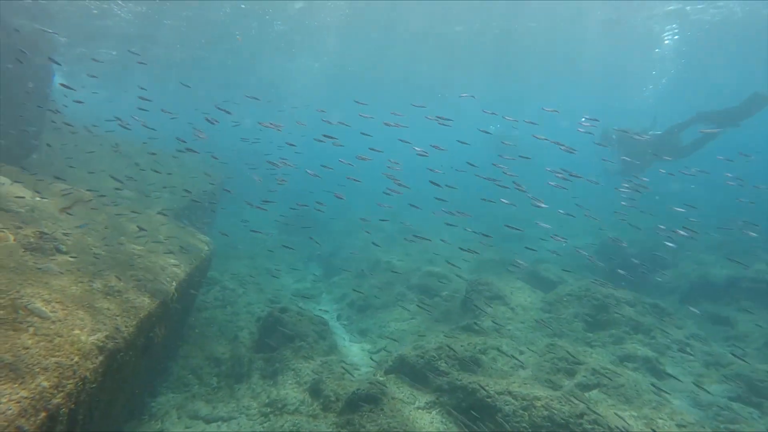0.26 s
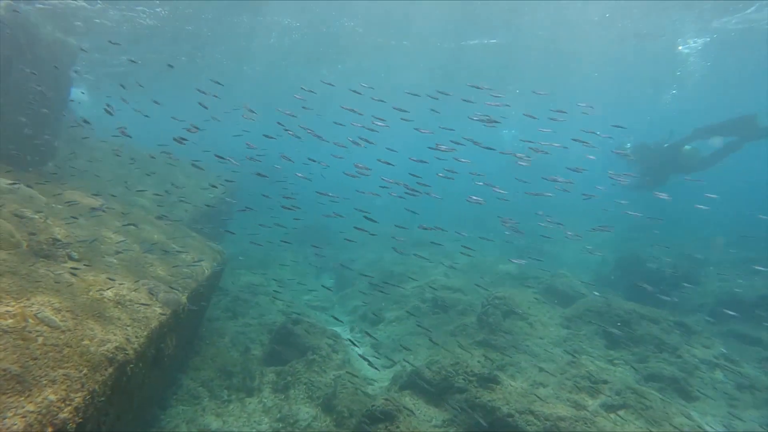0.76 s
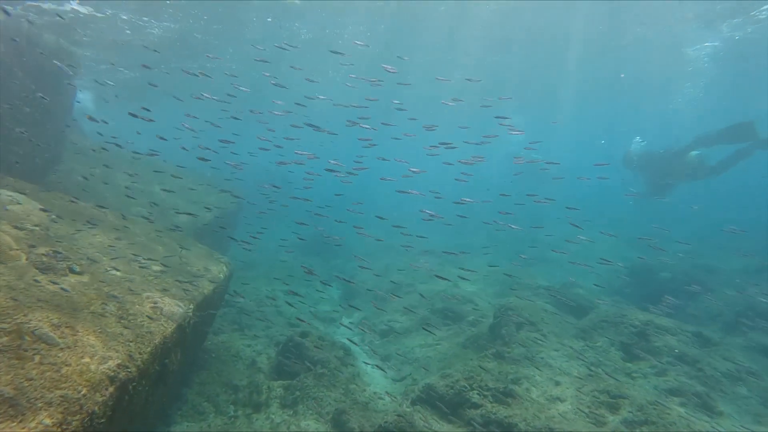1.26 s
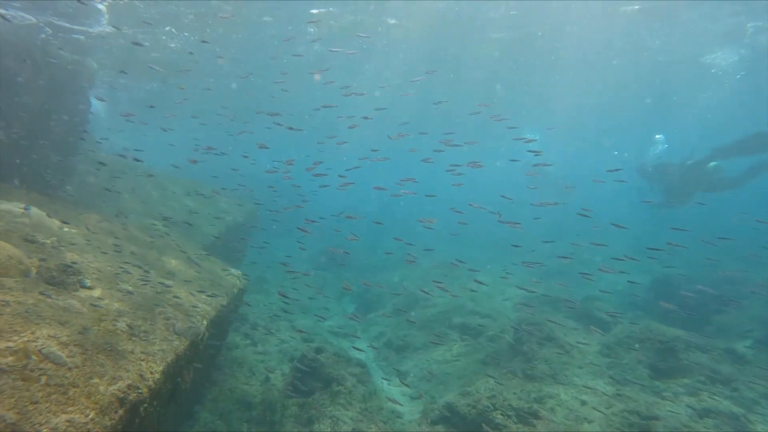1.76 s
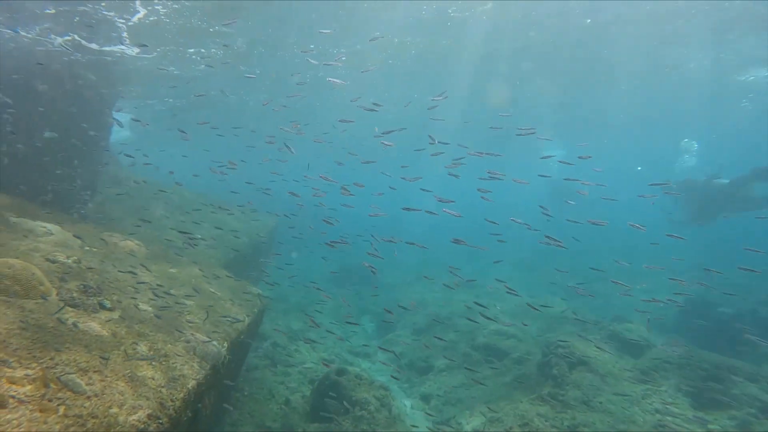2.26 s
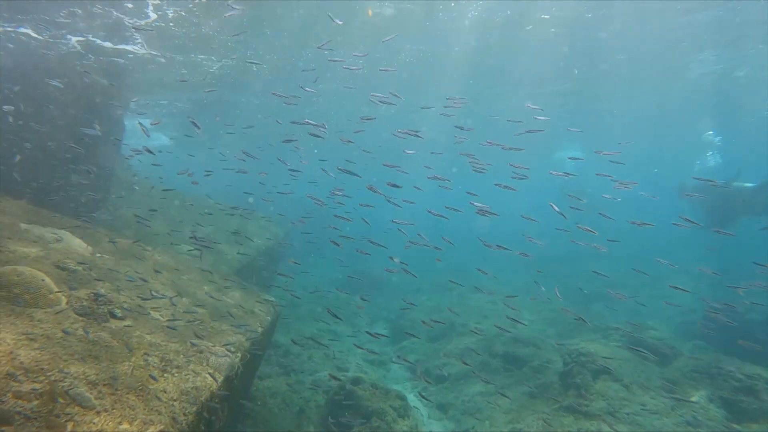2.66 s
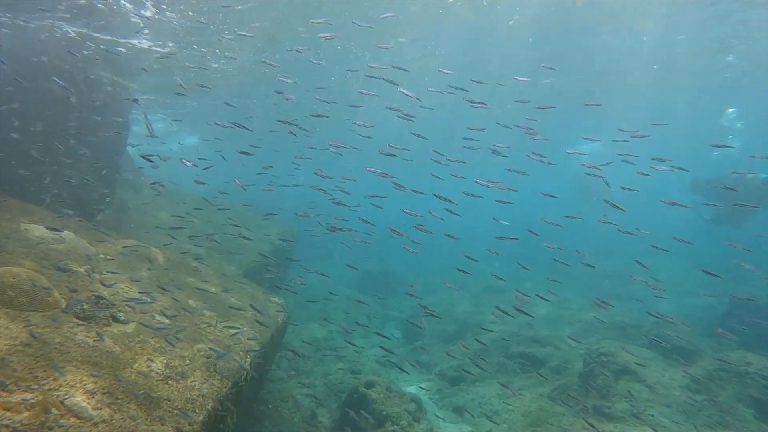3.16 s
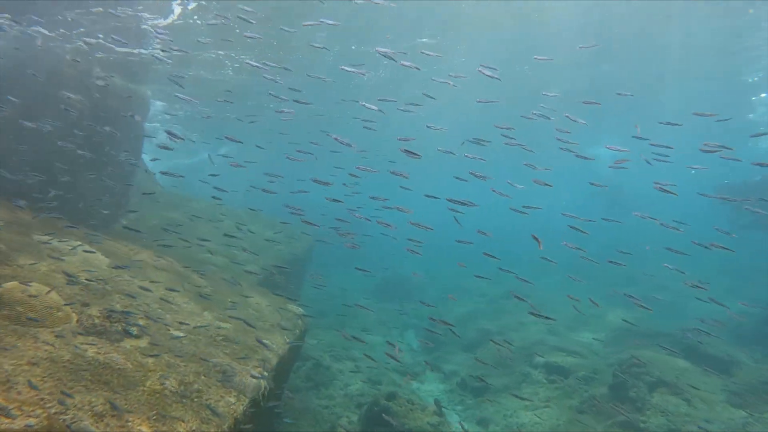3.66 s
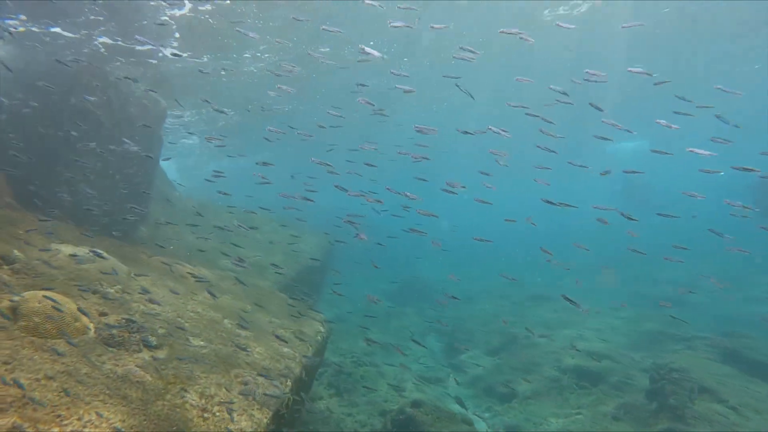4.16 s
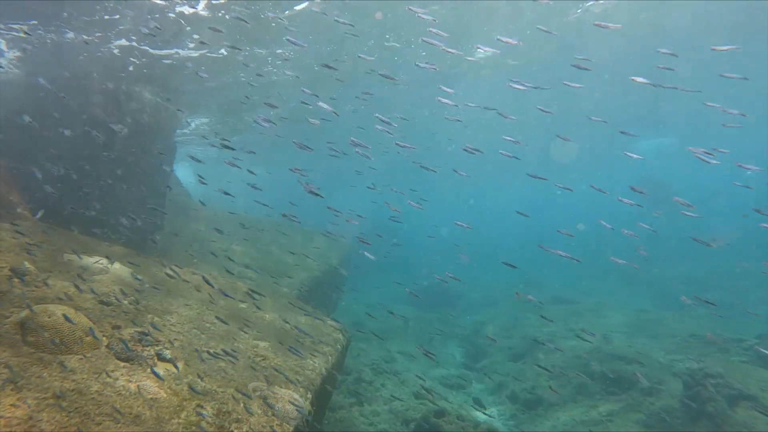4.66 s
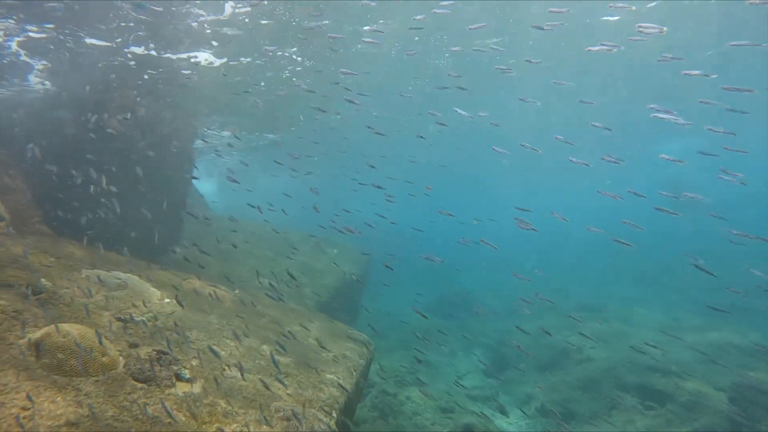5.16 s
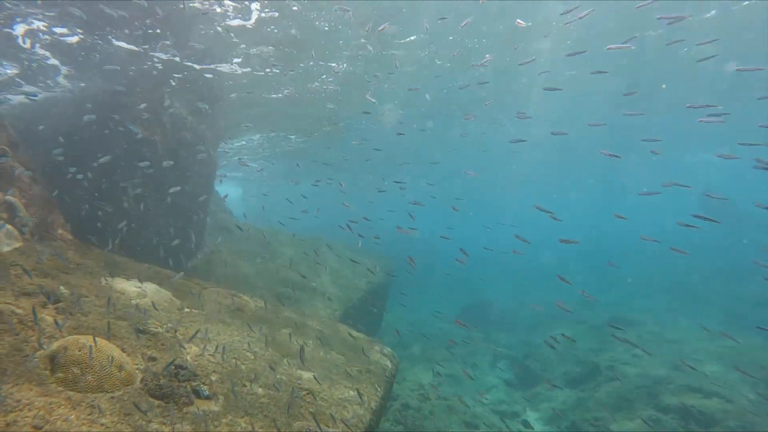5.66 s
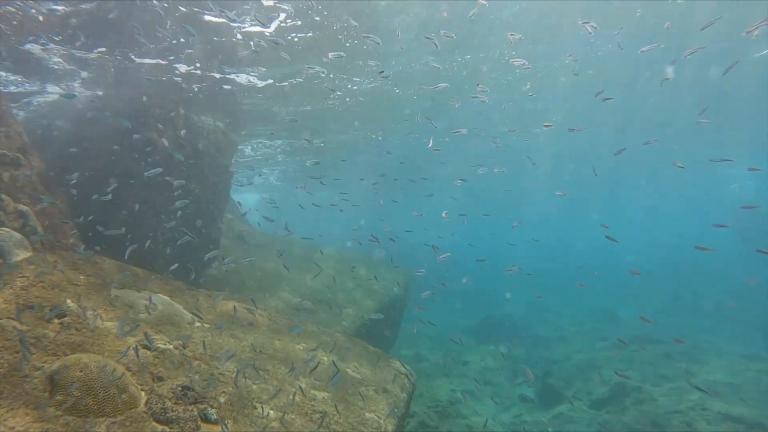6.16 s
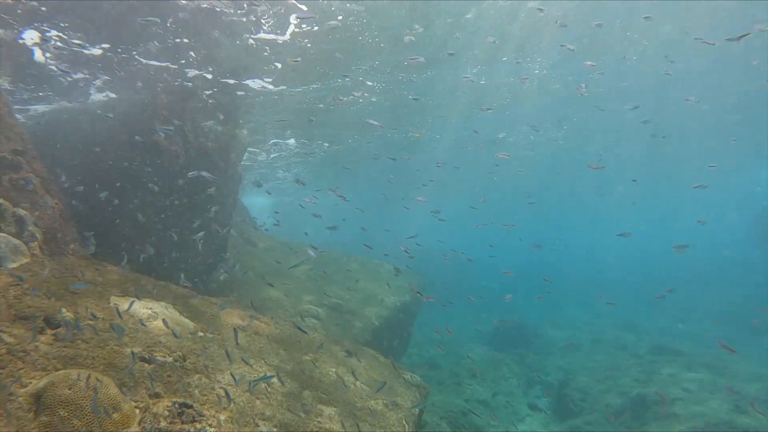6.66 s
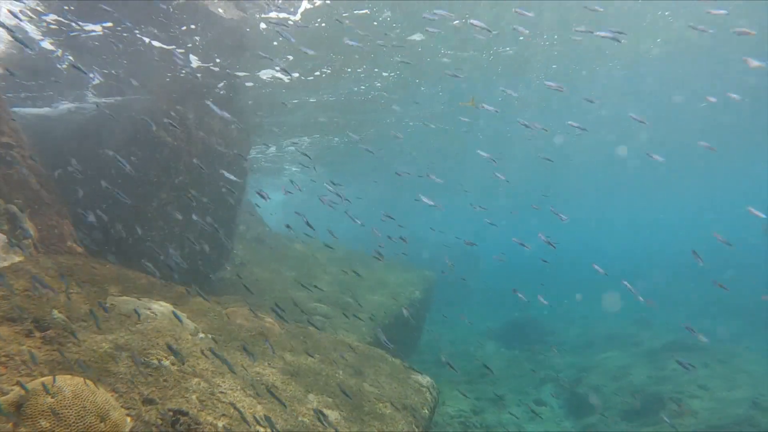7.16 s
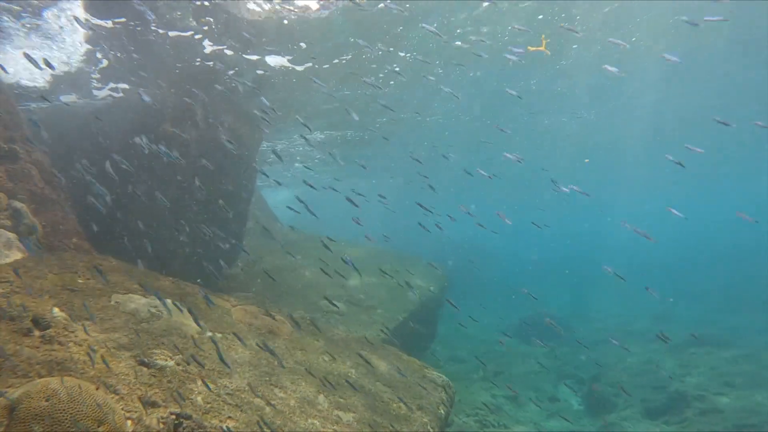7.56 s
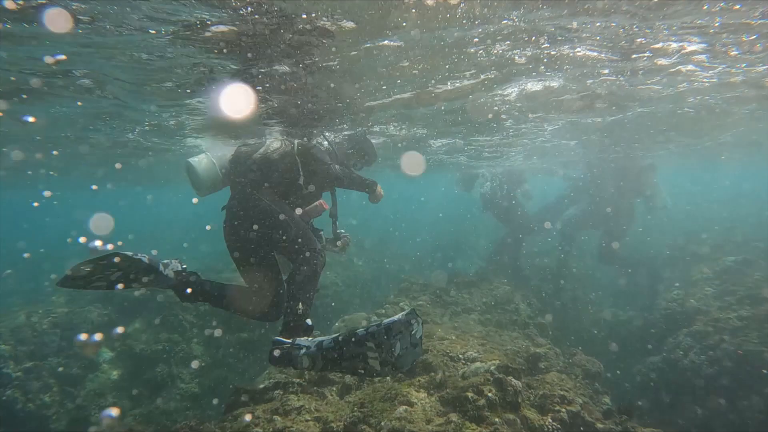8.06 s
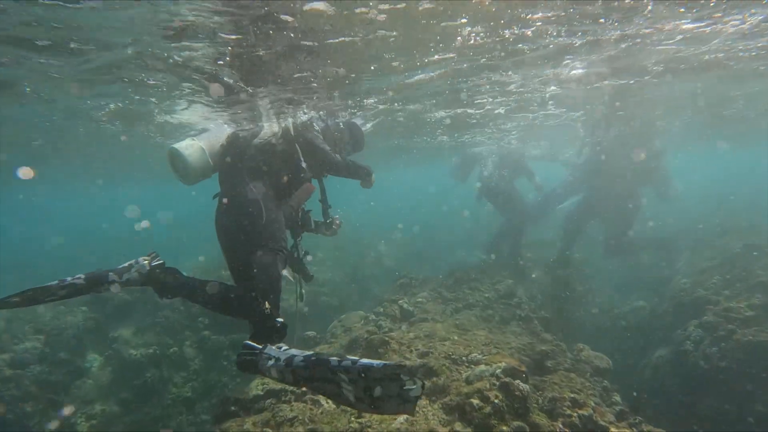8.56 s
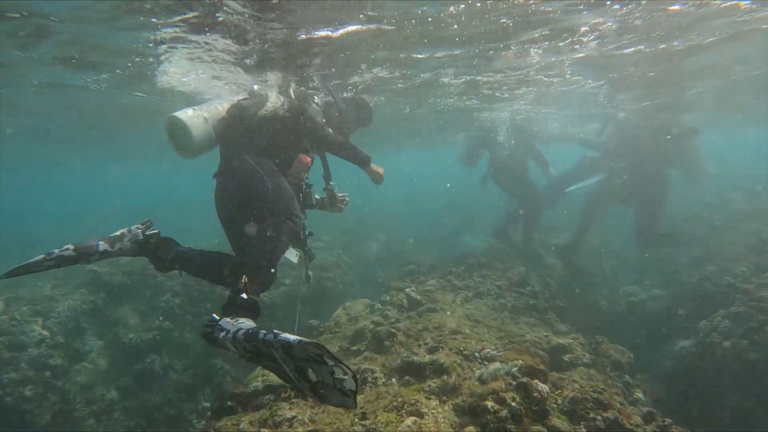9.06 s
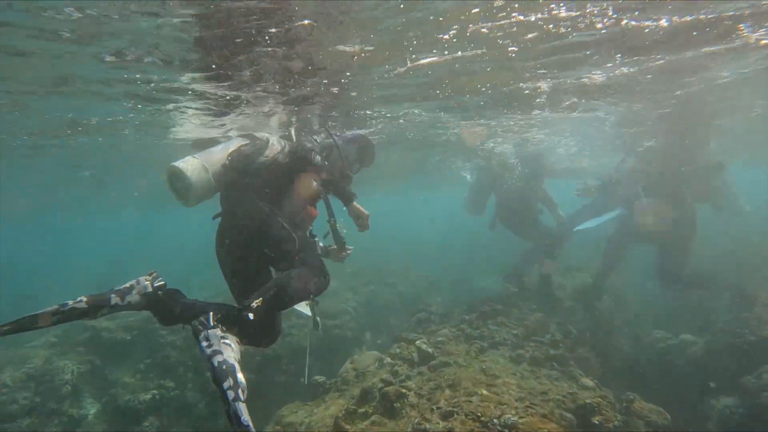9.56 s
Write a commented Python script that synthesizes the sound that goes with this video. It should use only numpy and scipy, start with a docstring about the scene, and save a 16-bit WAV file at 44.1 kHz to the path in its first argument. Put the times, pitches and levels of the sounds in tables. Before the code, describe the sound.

A muffled, boxy underwater ambience from a housed stereo microphone. Deep gurgling and slow shaking lie beneath dry clicks from nearby shrimp, low bubbles and soft thuds; one low moan lingers early. The middle gets busier with sharper snaps and opens from mono to wide. Close to the surface in the last two seconds, crackle is brighter, a wavering low hum rises, and the wash grows.

```python
"""Over a shallow reef, in a sealed housing with two microphones: gurgle, far shrimp crackle and hand tremble
from 0 s. Soon surge thumps, near snaps ringing the housing, bubbles, a moan and plops join; the image opens
from mono after 2.5 s. At 8 s the scene changes to one close to the surface: mode levels shift, a low drone
climbs and a thin fizz swells. From 9 s the upper wash swells. Noise through resonances makes water and fizz,
kicked resonances make snaps, damped sines make the air pockets, and wavering sines make tremble and drone."""
import sys
import numpy as np
from scipy import signal
from scipy.fft import rfft, irfft, next_fast_len
from scipy.io import wavfile
from scipy.ndimage import uniform_filter1d

SR = 44100
rng = np.random.default_rng(int(sys.argv[2]) if len(sys.argv) > 2 else 0)


def to_wav(s):
    """Save 16-bit WAV."""
    ch = np.atleast_2d(s).T  # columns
    pcm = np.round(np.clip(ch, -1, 1) * 32767)  # PCM
    wavfile.write(sys.argv[1], SR, pcm.astype(np.int16))


N = 432180

# near snaps: (time [s], peak at the pivot pitch [dB], brightness [dB/octave], narrowness [dB/octave^2])
NEAR_SNAPS = [(0.07, -16, -14.5, 23), (0.099, -26.5, -8.5, -8), (0.166, -26, -12.5, 5.5),
              (0.191, -40, 11, 2), (0.23, -21, -12, 14.5), (0.478, -50, 11.5, -4.5), (0.551, -23, 11, 7),
              (0.762, -39, 9, 9), (0.824, -36, 14.5, 5), (0.863, -26, 0.5, 8), (0.88, -34, 9, 4),
              (1.039, -23.5, -8, 2.5), (1.054, -46, -19, -8), (1.134, -26.5, -4, 9), (1.188, -27, 0, -0.5),
              (1.248, -26, 4, -0.5), (1.396, -36, 2, -1), (1.7, -34, 2, 1), (1.712, -10, 5, 32),
              (1.714, -24, 5.5, -2), (1.737, -26, -2, 10), (1.755, -10, -6.5, 18), (1.813, -33, 6, 13),
              (1.839, -42, -6, 10), (1.905, -37.5, -17, 7), (2.058, -38, -7.5, -10.5),
              (2.197, -21.5, -10, 14), (2.248, -39.5, -2, -8), (2.274, -17.5, -3, 13),
              (2.349, -23, -8, 8.5), (2.396, -33, -14.5, 8), (2.442, -31, 4, -0.5), (2.561, -38.5, -18, -1),
              (2.631, -28.5, -7, 1), (2.68, -22.5, 3, 10), (2.806, -27.5, -7.5, -0.5),
              (2.848, -53.5, 16, -2.5), (2.87, -47, -3, 8), (3.123, -41, -17, 2), (3.237, -29, -5, 15),
              (3.264, -23, -12, 7.5), (3.284, -27, -5, 9), (3.301, -26, -3, -1), (3.312, -20.5, 4, -1),
              (3.33, -37, 4, -1), (3.375, -26, -1.5, -4.5), (3.379, -27, -7.5, 7.5), (3.708, -36, 7.5, 5),
              (3.771, -33, -9, 17), (3.963, -38, 8, -0.5), (4.082, -23.5, 3, 1), (4.331, -26, 3, -3.5),
              (4.473, -32.5, -3, -8), (4.488, -26, -12, 6), (4.658, -35.5, 9.5, 0), (4.742, -35.5, 8.5, -1),
              (4.768, -26, -15, 2), (4.827, -21.5, 2, 5), (4.903, -51, 15, -2), (4.936, -33.5, -4, -7),
              (5.001, -30.5, 4.5, 6), (5.064, -25, 7.5, 6), (5.349, -29, 6, 0.5), (5.362, -16.5, -9.5, 11),
              (5.417, -32, -3, 12), (5.429, -24, -12.5, 16), (5.475, -26, 0, -2), (5.525, -19.5, -13, 18),
              (5.594, -25, -6, 14), (5.751, -19.5, -10, 12.5), (5.761, -22.5, -2.5, -4.5),
              (5.771, -26.5, 2.5, -1.5), (5.855, -22, 0, -1), (5.909, -19, -2, 8.5),
              (6.012, -29.5, 10, 4.5), (6.038, -16, -4, 13), (6.257, -8, -8.5, 5), (6.309, -36, 1, 4),
              (6.333, -29.5, 2, 3), (6.35, -24, -2, 1.5), (6.371, -14, -8, 24.5), (6.399, -11, -8.5, 5),
              (6.54, -35, -18, 6), (6.634, -21, -10, 4.5), (6.68, -20, 7, 9), (6.79, -22.5, 5, 7),
              (6.844, -17, 4.5, -0.5), (6.941, -16.5, 0, 5), (6.955, -12.5, -6, -4),
              (6.979, -29.5, 12, -0.5), (7.032, -33, 17, 5), (7.06, -14, 4.5, 7), (7.239, -21, 5.5, 0),
              (7.381, -31, 18, 9), (7.421, -16, 4.5, 4.5), (7.545, -41, -10.5, -6.5), (7.564, -29, 14, 3),
              (7.656, -23.5, 9, 11.5), (7.741, -34.5, 15, 7), (7.78, -25, 1, -2.5), (7.8, -19, -13.5, 6),
              (7.814, -31.5, -10.5, -8), (7.931, -20, 12.5, 4.5), (8.053, -25.5, 6.5, 1),
              (8.152, -29.5, 9.5, 3), (8.181, -34.5, -17, 4.5), (8.362, -28, 7, 6.5),
              (8.436, -15, -9.5, 14.5), (8.511, -27.5, 11, 3.5), (8.565, -11, -5, 1), (8.613, -40, 10, 2),
              (8.721, -29, -4, -5), (8.731, -22.5, 11.5, 2), (8.889, -48, 8, -1), (8.907, -35, 16, 3.5),
              (8.918, -29, 15, 7.5), (9.045, -39, 11.5, 3), (9.116, -41, 13.5, 1), (9.127, -7, 7, 3),
              (9.201, -31, 22, 9.5), (9.244, -32.5, 12.5, -0.5), (9.271, -38, 6, -2.5), (9.299, -40, 0, -1),
              (9.304, -17, 19.5, 7.5), (9.395, -33.5, 11, -0.5), (9.42, -21, 19, 8.5), (9.476, -26, -3, 11),
              (9.515, -52, 9, -4), (9.627, -35.5, 10, -1), (9.646, -24.5, 7, 12)]
# big bubbles: (time [s], peak [dB], starting pitch [Hz], rise [s])
BIG_BUBBLES = [(0.174, -25, 232.5, 0.014), (0.495, -16, 254.6, .012), (0.59, -20.5, 182, .012),
               (0.638, -4, 245, 0.0021), (0.66, -10, 239.4, 0.011), (0.742, -11.5, 263.5, 0.0058),
               (1.028, -20, 226, 0.0087), (1.146, -20.5, 232, 0.0064), (2.115, -21, 208, .008),
               (3.09, -10.5, 174.4, 0.0063), (3.488, -16.5, 217.8, .012), (3.803, -18.5, 220.4, .008),
               (3.977, -21, 196, .008), (5.509, -23.5, 247.6, 0.0088), (5.763, -10, 215, 0.0089),
               (5.913, -9, 283.6, 0.0049), (5.92, -23.5, 341, .012), (5.925, -19, 214, .012),
               (6.5, -15.5, 160.5, 0.021), (6.698, -14.5, 182.4, 0.004), (7.113, -19.5, 166, 0.02),
               (7.483, -17, 216.8, 0.0029), (8.041, -9.5, 150, 0.0074), (8.29, -17, 175.5, 0.0092),
               (8.439, -23.5, 161, 0.011), (8.584, -18, 198.4, .008), (8.68, -16, 176, 0.01),
               (9.037, -9.5, 198.6, 0.0085), (9.584, -8, 218.4, 0.01), (9.671, -19, 221, 0.01),
               (9.754, -18, 190.4, .012)]
# surge thumps: (time [s], peak [dB], starting pitch [Hz], rise [s])
SURGE_THUMPS = [(0.067, -26.5, 98, 0.03), (0.599, -21.5, 52, 0.025), (1.07, -14, 86, 0.031),
                (1.4, -15, 49, .015), (1.915, -18.5, 99.4, 0.014), (2.941, -15.5, 56.8, 0.013),
                (3.075, -17.5, 59, 0.013), (3.85, -11.5, 82.7, 0.0087), (5.061, -20, 65, 0.012),
                (5.128, -17, 46.5, 0.017), (5.764, -21, 57, 0.022), (5.824, -16, 49.1, 0.018),
                (7.929, -18, 84.3, .02), (8.04, -8.5, 95.7, 0.019), (8.21, -16, 95.3, .025),
                (9.023, -21, 47.6, 0.014), (9.338, -16, 75.7, 0.011), (9.443, -4.5, 68.5, 0.0049),
                (9.528, -11, 66.2, 0.017), (9.72, -20, 66, 0.028)]
# a low tone that lingers: (time [s], peak [dB], starting pitch [Hz], rise [s])
LOW_MOAN = [(.55, -20, 130.1, .058)]
# small bubbles that plop: (time [s], peak before flutter [dB], starting pitch [Hz])
SMALL_PLOPS = [(0.563, -27.5, 731), (0.593, -9, 789), (0.611, -24, 802), (1.039, -32.5, 840),
               (1.685, -30.5, 889), (1.945, -20, 783), (3.713, -27.5, 760), (3.732, -16, 803),
               (3.772, -29.5, 883), (3.826, -33.5, 785), (4.766, -11, 797), (4.79, -24, 800),
               (6.635, -24.5, 842), (7.902, -22, 650)]
# housing resonances: (pitch [Hz], width [Hz], level deep [dB], level near the surface [dB])
HOUSING_MODES = [(490, 506, -2, -5.5), (676, 95, 2.5, -14.5), (818, 119, 7.5, 0), (1140, 140, -15, -9),
                 (1274, 124, -2, -3), (1419, 98, -1.5, -7.5), (1810, 800, -8.5, -14.5),
                 (2400, 510, -20, -7.5), (2598, 119, -4, -5.5), (2852, 180, -12, -11.5),
                 (3247, 426, -12.5, -17), (3850, 200, -24, -18), (4770, 710, -27.5, -37.5),
                 (6310, 130, -29.5, -43.5), (6400, 520, -33.5, -47)]
# gurgle resonances: (pitch [Hz], width [Hz], level deep [dB], level near the surface [dB])
GURGLE_MODES = [(28.4, 20.4, 4, 5.5), (59.4, 48, -8.5, -4.5), (100.9, 27, -3.5, -0.5),
                (155, 33.3, -5.5, -2.5), (208, 52.3, 1, -1.5), (264.4, 64, -5.5, -20.5),
                (325.9, 54.5, -5, -15.5)]
# pitch bands of a snap: (from [Hz], to [Hz], centre [Hz])
SNAP_BANDS = [(0, 1000, 800), (1000, 1900, 1400), (1900, 4200, 2800), (4200, 8000, 5500)]
# one entry per snap band: (level [dB]), (lead [s]), (rise [s]), (fall [s])
BAND_DB = [0, -1.5, -2, -20]
BAND_LEAD_S = [.0014, .0011, .0004, 0]
BAND_RISE_S = [.0008, .001, .0014, .0016]
BAND_FALL_S = [0.0024, 0.002, 0.0013, 0.0011]
# water levels: (time [s], gurgle [dB], far crackle [dB])
WATER_LEVELS = [(0.0, -19, -31), (0.3, -22.5, -36.5), (0.7, -21.5, -42), (1.15, -25.5, -36.5),
                (1.5, -26.5, -41), (2.8, -26, -38), (3.6, -23, -39.5), (5.3, -27, -38.5), (6.0, -26, -35.5),
                (7.4, -28.5, -37.5), (8.22, -23.5, -32), (8.8, -27.5, -30.5), (9.4, -22, -28),
                (9.8, -16, -31)]
# hand tremble: (time [s], level [dB])
TREMBLE_LEVELS = [(0.0, -19), (0.65, -11), (0.79, -28.5), (0.95, -13.5), (2.73, -21.5), (2.84, -8),
                  (2.98, -22.5), (3.19, -10.5), (4.09, -14.5), (4.28, -31.5), (4.88, -10.5), (4.94, -16),
                  (7.01, -20.5), (7.37, -9), (7.53, -23), (7.67, -11), (8.27, -23.5), (9.8, -17)]
# how the two microphones differ: (pitch [Hz], side minus mid at 0 dB width [dB], phase [radians])
MICROPHONE_DIFFERENCE = [(12, -26.5, 1.5), (60, -28.5, .8), (180, -26.5, .5), (330, -9.5, .5),
                         (750, -12.5, 0.35), (1400, -5.5, 1.3), (2000, -7.5, 1.3), (3000, -14, 2.2),
                         (4200, -8.5, 1.2), (6000, -16.5, .8)]
# stereo image: (time [s], width [dB])
IMAGE_WIDTH = [(0, -58.5), (2.5, -35), (3.0, -13), (4.5, -4.5), (6.0, -1.5), (8.0, 0.5), (8.1, 2.5),
               (9.8, 2.5)]

SCENE_CHANGE_S = 8.0
# near the surface its mirror image cancels one band, and the wash above it swells
MIRROR_HZ, MIRROR_WIDTH_HZ = 1760, 380
WASH_S, WASH_DB_PER_S = 9.05, 4
CALM_DB = -4  # small far snaps stand out less near the surface
NOTCH_HZ, NOTCH_WIDTH_HZ = 411, 31
TREMBLE_HZ, TREMBLE_WIDTH_HZ = 10, 4.13
PIVOT_HZ = 1500
SPIKE = 15  # against noise of spread 1
SNAP_DAMPING = 2.55  # widens the housing modes
TAIL_DB, TAIL_STRETCH = -17.5, 6
THUD_CUT_DB = 6  # a snap stirs the lowest mode less
# t60 of an air pocket at the pivot peak; the louder, the sooner it dies
BUBBLE_T60_S, THUMP_T60_S, MOAN_T60_S, PLOP_T60_S = 0.15, 0.24, 1.4, 0.048
T60_PIVOT_DB, HALVING_DB = -21.5, 21.5
PLOP_RISE_S = 0.003
DRONE_S, DRONE_HZ, CLIMB_HZ_PER_S = 7.97, 161.6, 34
DRONE_DB, DRONE_DIP_DB = -23.5, 8.5
TOP_HZ, EDGE_HZ, HISS_DB = 7000, 11800, -89


def undb(db):
    """Decibels to amplitude."""
    return 10 ** (np.asarray(db) / 20)


def unit(x):
    """Scale to an rms of 1."""
    return x / np.sqrt(np.mean(x ** 2))


def clock():
    """Time of every sample in seconds."""
    return np.arange(N) / SR


def ring(x, hz, width):
    """A resonance applied twice, so its skirts are steep."""
    b, a = signal.iirpeak(hz, hz / (1.288 * width), fs=SR)
    return signal.lfilter(b, a, signal.lfilter(b, a, x))


def walk(rate):
    """Random levels held 1 / rate s and slewed twice; spread near 1."""
    hold = int(SR / rate)
    steps = np.repeat(rng.standard_normal(N // hold + 1), hold)
    return 1.294 * uniform_filter1d(uniform_filter1d(steps, hold), hold)[:N]


def curves(table):
    """Straight lines between the rows, one curve per column after time."""
    times, *columns = np.transpose(table)
    return [np.interp(clock(), times, column) for column in columns]


def place(deep_db, shallow_db):
    """Gain that changes as the scene shifts to one close to the surface."""
    return undb(np.interp(clock(), [SCENE_CHANGE_S - 0.03, SCENE_CHANGE_S + 0.069], [deep_db, shallow_db]))


def add(out, start_s, x):
    """Mix a sound in at its start time, cut at the end."""
    i = max(int(start_s * SR), 0)
    out[..., i:i + x.shape[-1]] += x[..., :N - i]


def burst(count, fall_s, rise_s=0.00049):
    """Envelope with a quick exponential rise and decay."""
    t = np.arange(count) / SR
    return (1 - np.exp(-t / rise_s)) * np.exp(-t / fall_s)


def gurgle(level_db):
    """Distant bubble clouds and surf: low resonances that flutter and are kicked by lone bubbles."""
    out = 0
    lump = burst(count=6000, rise_s=0.00074, fall_s=0.03)
    shared_kicks = rng.random(N) < 2.5 / SR  # these reach every resonance at once
    for hz, width, deep_db, shallow_db in GURGLE_MODES:
        own_kicks = rng.random(N) < 2.5 / SR
        kicks = (shared_kicks | own_kicks) * rng.random(N)
        swell = (1 + 2.2 * signal.oaconvolve(kicks, lump)[:N]) * undb(2.8 * walk(11))
        mode = unit(ring(swell * rng.standard_normal(N), hz, width))
        out = out + place(deep_db, shallow_db) * np.sqrt(width) * mode
    return undb(level_db) * unit(out)


def crackle(level_db):
    """Countless far snaps blur to a hiss; small ones stand out in flurries, each favouring one pitch region."""
    out = 0
    hits_per_s = 320 * undb(2.5 * walk(6))
    hits = (rng.random(N) < hits_per_s / SR) * undb(np.minimum(2.95 * rng.exponential(size=N), 13))
    centre_octave = rng.uniform(np.log2(600), np.log2(9000), N)
    for hz, width, deep_db, shallow_db in HOUSING_MODES:
        lean_db = -16 * (np.log2(hz) - centre_octave) ** 2 + 3 * rng.standard_normal(N)
        # the treble dies sooner
        decay = burst(count=900, fall_s=0.0024 * (1800 / hz) ** 0.4)
        gust = signal.oaconvolve(hits * undb(lean_db), decay)[:N]
        swell = 1 + 2.5 * (hz / 1800) ** 0.3 * place(0, CALM_DB) * gust
        swell = swell * undb(2.2 * walk(24) + 1.5 * walk(4))
        if hz > MIRROR_HZ:
            swell = swell * undb(WASH_DB_PER_S * np.maximum(clock() - WASH_S, 0))
        mode = unit(ring(swell * rng.standard_normal(N), hz, width))
        out = out + place(deep_db, shallow_db) * np.sqrt(width) * mode
    mirror = signal.lfilter(*signal.iirpeak(MIRROR_HZ, MIRROR_HZ / MIRROR_WIDTH_HZ, fs=SR), out)
    out = out - place(-41, -1.5) * mirror
    return undb(level_db) * unit(out)


def tremble(level_db):
    """The hand shakes the housing some ten times a second: a sine wavering in pitch and level."""
    hz = TREMBLE_HZ + TREMBLE_WIDTH_HZ / 2 * walk(12)
    phase = 2 * np.pi * np.cumsum(hz) / SR
    return np.sqrt(2) * undb(level_db + walk(7.5)) * np.sin(phase)


def air_pockets(table, glide, t60_s, flutter_db=0, flutter_s=0.0084):
    """Damped sines that swell quickly and may flutter; pitch slides by 2 * glide of its start per second."""
    out, t = np.zeros(N), np.arange(SR) / SR
    for time_s, peak_db, hz, rise_s in table:
        t60 = t60_s * 2 ** (-(peak_db - T60_PIVOT_DB) / HALVING_DB)
        shape = (1 - np.exp(-t / rise_s)) ** 2 * 1000 ** (-t / t60)
        window = np.hanning(int(2 * flutter_s * SR))
        wobble = unit(signal.oaconvolve(rng.standard_normal(SR), window, "same"))
        flutter = undb(flutter_db * np.minimum(t / (4 * rise_s), 1) * wobble)
        tone = np.sin(2 * np.pi * (hz * (t + glide * t ** 2) + rng.random()))
        add(out, time_s - rise_s / 2, undb(peak_db) * tone * flutter * shape / shape.max())
    return out


def thumps():
    """Surge thumps: the lowest air pockets, sliding up as they rise."""
    return air_pockets(SURGE_THUMPS, 0.73, THUMP_T60_S)


def snap_band(push, echoes, favour_db, tilt_db, shallow, band, rise_s, fall_s):
    """One band of a snap: a burst with a ragged tail and echoes kicks the housing modes in that band."""
    lo, hi, centre = band
    count = len(push)
    shape = burst(count, fall_s, rise_s) + undb(TAIL_DB) * burst(count, TAIL_STRETCH * fall_s, rise_s)
    blow = push * signal.fftconvolve(shape, echoes)[:count]
    blow = signal.lfilter(*signal.butter(3, min(hi, 5200), fs=SR), blow)
    out = np.zeros(count)
    for k, (hz, width, deep_db, shallow_db) in enumerate(HOUSING_MODES):
        if not lo < hz < hi:
            continue
        db = shallow_db if shallow else deep_db
        if lo > 0:  # the lowest band keeps the plain mode levels
            db += favour_db[k] + tilt_db * np.log2(hz / centre)
        if k == 0:
            db -= THUD_CUT_DB
        # neighbouring modes alternate in sign
        out += (-1) ** k * undb(db) * ring(blow, hz, SNAP_DAMPING * width)
    return out / np.abs(out).max()


def snaps():
    """Near shrimp: a spike and dry noise burst, a faint tail and two echoes off the rock ring the housing."""
    out, count, front = np.zeros(N), 2600, 60  # lengths in samples
    for time_s, peak_db, tilt_db, narrow_db in NEAR_SNAPS:
        push = rng.standard_normal(count)
        favour_db = 3 * rng.standard_normal(len(HOUSING_MODES))
        lags_s = rng.uniform([0.0035, 0.007], [0.0052, 0.010])
        # the collapsing bubble gives one hard spike at the front
        push[front] += SPIKE
        echoes = np.zeros(count)
        echoes[[0, *(lags_s * SR).astype(int)]] = 1, 0.5, 0.1
        bands = zip(SNAP_BANDS, BAND_LEAD_S, BAND_RISE_S, BAND_FALL_S, BAND_DB)
        for band, lead_s, rise_s, fall_s, band_db in bands:
            octaves = np.log2(band[2] / PIVOT_HZ)
            db = peak_db + band_db + tilt_db * octaves - narrow_db * octaves ** 2
            part = snap_band(push, echoes, favour_db, tilt_db, time_s > SCENE_CHANGE_S, band, rise_s, fall_s)
            add(out, time_s - lead_s, undb(db) * part)
    return out


def bubbles():
    """Big bubbles: air pockets that flutter slightly and slide up as they rise."""
    return air_pockets(BIG_BUBBLES, 0.63, BUBBLE_T60_S, flutter_db=0.5, flutter_s=0.01)


def moan():
    """A lingering low damped tone that sags in pitch."""
    return air_pockets(LOW_MOAN, -0.08, MOAN_T60_S)


def plops():
    """Small bubbles: short, high air pockets with a strong flutter."""
    table = [(*plop, PLOP_RISE_S) for plop in SMALL_PLOPS]
    return air_pockets(table, 0.3, PLOP_T60_S, flutter_db=4)


def drone():
    """A low sine climbs, wavering in pitch and throbbing."""
    since = clock() - DRONE_S
    hz = DRONE_HZ + CLIMB_HZ_PER_S * since
    fade_in = np.clip(since / 0.039, 0, 1)
    phase = 2 * np.pi * np.cumsum(hz * (1 + 0.035 * walk(36))) / SR
    level_db = DRONE_DB - DRONE_DIP_DB * np.abs(walk(22))
    return fade_in * np.sqrt(2) * undb(level_db) * np.sin(phase)


def fizz(db=-62, hz=5900, width=500):
    """A thin high band of noise swells for a second after the scene changes and stays faint otherwise."""
    shape = np.interp(clock(), [8.0, 8.3, 8.75, 9.1], [0.11, 0.7, 0.51, 0.088])
    return undb(db) * shape * unit(ring(rng.standard_normal(N), hz, width))


def microphones(mid):
    """The side is a coloured, phase-turned, wavering share of the mid, plus a little treble of its own."""
    hz, db, turn = np.transpose(MICROPHONE_DIFFERENCE)
    size = next_fast_len(N)
    at = np.log(np.fft.rfftfreq(size, 1 / SR) + 1)
    gain = undb(np.interp(at, np.log(hz), db)) * np.exp(1j * np.interp(at, np.log(hz), turn))
    share = irfft(rfft(mid, size) * gain, size)[:N]
    side = undb(curves(IMAGE_WIDTH)[0] + 2 * walk(35)) * share
    side = side + undb(-71.5) * unit(ring(rng.standard_normal(N), 6000, 1400))
    return np.array([mid + side, mid - side])


def scene():
    """All the sounds of the reef and the housing, heard by both microphones."""
    gurgle_db, crackle_db = curves(WATER_LEVELS)
    water = gurgle(gurgle_db) + crackle(crackle_db)
    # the housing is deaf in a narrow gap above the gurgle
    water = signal.lfilter(*signal.iirnotch(NOTCH_HZ, NOTCH_HZ / NOTCH_WIDTH_HZ, fs=SR), water)
    pockets = thumps() + bubbles() + moan() + plops()
    handling = tremble(curves(TREMBLE_LEVELS)[0])
    return microphones(water + handling + pockets + snaps() + drone() + fizz())


def record(dry):
    """The loudest peaks clip, and the top is cut over a faint electronic hiss."""
    clipped = np.clip(dry, -0.97, 0.97)
    cut = signal.sosfilt(signal.butter(8, TOP_HZ, fs=SR, output="sos"), clipped)
    mid, side = rng.standard_normal((2, N))
    hiss = undb(HISS_DB) * (mid + 0.25 * side * np.array([[1], [-1]]))
    return signal.sosfilt(signal.butter(10, EDGE_HZ, fs=SR, output="sos"), cut + hiss)


dry = scene()
out = record(dry)
to_wav(out)
```